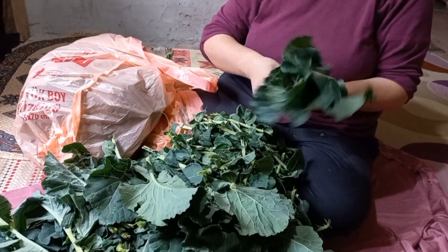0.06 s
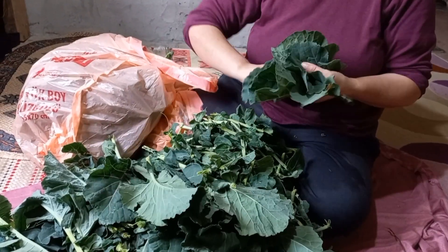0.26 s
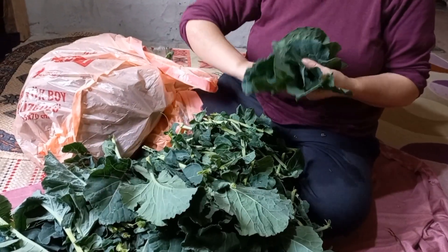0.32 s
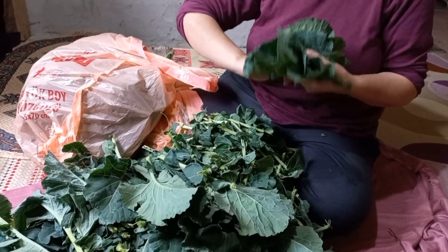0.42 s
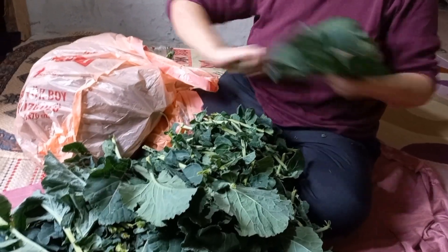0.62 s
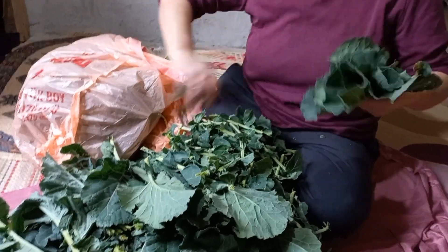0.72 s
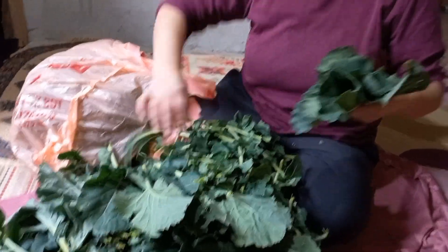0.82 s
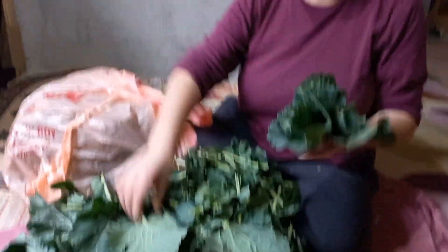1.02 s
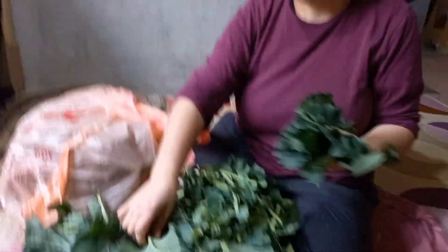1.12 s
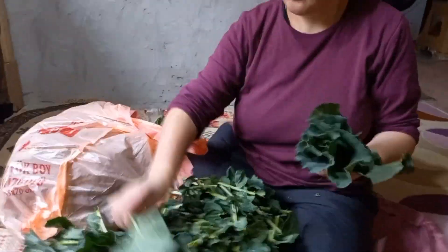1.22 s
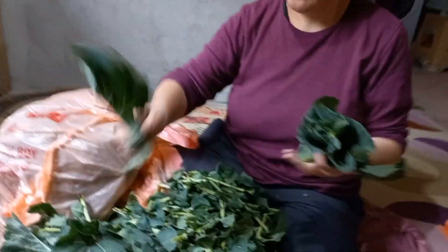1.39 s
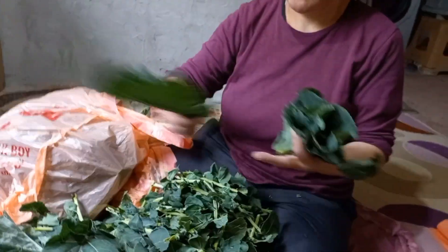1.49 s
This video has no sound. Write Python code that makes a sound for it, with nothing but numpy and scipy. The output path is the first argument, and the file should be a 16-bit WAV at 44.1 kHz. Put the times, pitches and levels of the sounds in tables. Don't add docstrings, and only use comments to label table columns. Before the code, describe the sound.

Crisp leaf rustling with duller plastic-sack rubbing, heard near the microphone indoors; one sharp loud stalk crack early, two weaker ones after, then a low fluttering leaf drag, short room echo and faint hiss.

```python
import sys
import numpy as np
from scipy import signal
from scipy.fft import rfft, irfft, next_fast_len
from scipy.io import wavfile
from scipy.ndimage import uniform_filter1d, map_coordinates

SR = 44100
rng = np.random.default_rng(int(sys.argv[2]) if len(sys.argv) > 2 else 0)


def volts(x):
    e = np.asarray(x, float) / 20
    return 10 ** e


def pcm_store(signal):
    levels = np.round(np.clip(np.atleast_2d(signal), -1, 1) * 32767)
    wavfile.write(sys.argv[1], SR, levels.astype(np.int16).T)


N = 68355

# frequency_hz, density_db (per Hz)
FRACTURE_HISS = [(300, -61), (900, 2.5), (1400, -30), (3000, 4.5), (8000, 6), (15000, 4)]
LEFT_LAG_S = 3 / 44100
FLOP_PAN_DB = -4


def unit(x):
    return x / np.sqrt(np.mean(x ** 2) + 1e-20)


def along(points, hz):
    f, v = np.transpose(points)
    return np.interp(np.log(hz + 1), np.log(f + 1), v)


def curves(rows):
    s, *columns = np.transpose(rows)
    return [np.interp(np.arange(N) / SR, s, column) for column in columns]


def wobble(rate):
    return map_coordinates(rng.standard_normal(200), [np.arange(N) * rate / SR])


def filtered(x, response):
    m = next_fast_len(x.shape[-1] + 8192)
    spectrum = rfft(x, m) * response(np.fft.rfftfreq(m, 1 / SR))
    return irfft(spectrum, m)[..., :x.shape[-1]]


def coloured(x, spectrum):
    return filtered(x, lambda hz: volts(along(spectrum, hz)))


def paired(pair, likeness=None, lag_s=LEFT_LAG_S):
    # frequency_hz, likeness (0-1)
    diffuse = [(80, 0.71), (300, 0.79), (1000, 0.19), (2500, 0.47), (6000, 0.024)]
    if likeness is None:
        likeness = diffuse

    def mid_side(hz):
        angle = np.arccos(np.clip(along(likeness, hz), 0, 1)) / 2
        return np.array([np.cos(angle), np.sin(angle)])

    def delay(hz):
        return np.exp(-2j * np.pi * hz * lag_s * np.array([[1], [0]]))

    mid, side = filtered(pair, mid_side)
    return filtered(np.array([mid + side, mid - side]), delay)


def rush(spectrum, patchy_db):
    z = signal.stft(rng.standard_normal((2, N)), nperseg=256)[2]
    field = uniform_filter1d(rng.standard_normal(z.shape[1:]), size=5, axis=0)
    field = uniform_filter1d(field, size=10, axis=1)
    pair = signal.istft(z * volts(patchy_db * unit(field)), nperseg=256)[1][:, :N]
    return unit(paired(coloured(pair, spectrum)))


def room(x):
    # frequency_hz, t60_s
    decay = [(200, 0.58), (2000, 0.28), (6000, 0.23), (14000, 0.22)]
    hz, t, z = signal.stft(rng.standard_normal((2, SR // 3)), SR, nperseg=128)
    decayed = z * volts(-60 * t / along(decay, hz)[:, None])
    tail = paired(signal.istft(decayed, SR, nperseg=128)[1])
    delayed = np.pad(x, (90, 0))
    return signal.fftconvolve(delayed[None], tail / np.linalg.norm(tail[0]), axes=1)


def add(out, s, pair, sent, pan_db=0, lag_s=LEFT_LAG_S):
    # frequency_hz, likeness (0-1)
    direct_likeness = [(300, .95), (2000, .9), (4500, .6), (9000, .3)]
    both = room(sent)
    pan = volts(np.array([[pan_db / 2], [-pan_db / 2]]))
    both[:, :pair.shape[1]] += paired(pair, direct_likeness, lag_s) * pan
    out[:, round(s * SR):][:, :both.shape[1]] += both


def burst(t, t60, spectrum):
    noise = unit(coloured(rng.standard_normal((2, len(t))), spectrum))
    return noise * volts(-60 * t / t60) * (1 - np.exp(-t / 0.000067)) / 2


def impulse(t):
    return 1. * (np.arange(len(t)) == 40)


def air():
    # frequency_hz, density_db (per Hz)
    floor = [(25, -86), (55, -20), (90, -3.5), (220, -7.5), (450, -11.5), (1000, -18), (3000, -24.5),
             (15000, -25.5)]
    level_db = -68.5 - 1.5 + 0.67 * wobble(12.1)
    return volts(level_db) * rush(floor, patchy_db=3.5)


def rubbing():
    # start_s, level_db, brightness (0-1)
    strokes = [(0, -50.5, 0.04), (.045, -58, 0.43), (.155, -49, 0.89), (.2, -50.5, 0.77),
               (.395, -57.5, 0.78), (.44, -65.5, 0.56), (.46, -51.5, 0.74), (.512, -59.5, 0.33),
               (.519, -55, 0.8), (.558, -52, 1), (.598, -65.5, 0.88), (.7, -58.5, 0.24), (.76, -54.5, 0.32),
               (.87, -55, 0.3), (.92, -51.5, 0.2), (1.09, -63.5, 0.56), (1.16, -53, 0.82), (1.23, -59, 0.6),
               (1.33, -57.5, 0.56), (1.38, -69.5, 0.53), (1.55, -70, 0.65)]
    # frequency_hz, density_db (per Hz)
    dull = [(300, -13), (600, -12.5), (950, -12.5), (1400, -2), (2600, -5), (4500, -8), (9000, -18.5),
            (15000, -14.5)]
    # frequency_hz, density_db (per Hz)
    crisp = [(300, -22), (900, -19), (1400, -27.5), (2500, -1), (4500, -3.5), (7500, -2), (11000, -4.5),
             (15000, -8)]
    grains_per_s, grain_spread_db, grain_db, wet_db = 1400, 10.5, 2, -3.5
    level_db, bright = curves(strokes)
    bright, out = np.clip(bright, 0, 1), 0
    for spectrum, share in ((dull, 1 - bright), (crisp, bright)):
        draw = rng.random((2, N))
        slips = (draw[0] < grains_per_s / SR) * volts(-grain_spread_db * draw[1])
        grain_noise = uniform_filter1d(slips, size=24) * rng.standard_normal((2, N))
        cracks = unit(coloured(grain_noise, spectrum))
        grains = unit(paired(cracks) + volts(wet_db) * room(cracks[0])[:, :N])
        gain = volts(level_db + .8 * wobble(25) + wobble(90)) * np.sqrt(share)
        out = out + gain * unit(rush(spectrum, patchy_db=2.2) + volts(grain_db) * grains)
    return out


def drag():
    # time_s, level_db
    rumble = [(.985, -68), (.997, -57.5), (1.068, -58), (1.078, -61), (1.11, -59), (1.145, -60),
              (1.175, -63), (1.195, -72), (1.31, -72), (1.36, -81)]
    # frequency_hz, density_db (per Hz)
    rumble_colour = [(40, -30), (85, -3), (150, -5), (350, -1), (540, 0), (700, -16), (1000, -30),
                     (2000, -60)]
    # time_s, level_db
    swish = [(.97, -67), (.99, -54), (1.03, -59.5), (1.08, -62), (1.115, -60), (1.17, -53.5), (1.195, -62),
             (1.32, -77)]
    # frequency_hz, density_db (per Hz)
    swish_colour = [(300, -16), (600, -3), (850, -3), (1100, 0), (1700, -3), (2800, -6), (8000, -12),
                    (15000, -20)]
    rumble_db, = curves([(rumble[0][0] - .1, -99)] + list(rumble) + [(rumble[-1][0] + .05, -99)])
    swish_db, = curves([(swish[0][0] - .05, -99)] + list(swish) + [(swish[-1][0] + .05, -99)])
    brushing = volts(swish_db + 2.3 * wobble(80.06)) * rush(swish_colour, patchy_db=2.0)
    sliding = volts(rumble_db + 2.8 * wobble(59.7)) * rush(rumble_colour, patchy_db=-1.0)
    return brushing + sliding * volts([[FLOP_PAN_DB / 2], [-FLOP_PAN_DB / 2]])


def flops():
    # start_s, level_db (peak), pitch_hz
    pushes = [(.004, -54.5, 467), (0.238, -56.5, 248), (0.381, -53, 370), (.392, -60, 300),
              (0.618, -57, 357), (.998, -50, 470), (1.002, -48, 400), (1.013, -52, 280), (1.0315, -43, 360),
              (1.041, -52, 330), (1.055, -49, 430), (1.061, -43.5, 380), (1.067, -49, 330),
              (1.093, -52, 400), (1.105, -52, 200), (1.12, -46, 380), (1.1245, -44, 330),
              (1.1325, -41.5, 330), (1.14, -48, 330), (1.165, -56, 139), (1.262, -62, 92),
              (1.309, -58.5, 119), (1.484, -61.5, 95)]
    cycles, wet_db = 2.6, -9
    out, t = np.zeros((2, N + SR)), np.arange(SR // 8) / SR
    for s, db, hz in pushes:
        u = t * hz / cycles * 6
        glide = 1 - 0.026 * np.tanh(u / 4)
        push = volts(db) * np.sin(2 * np.pi * hz * t * glide) * u * np.exp(1 - u)
        add(out, s, np.array([push, 0 * push]), volts(wet_db) * push, FLOP_PAN_DB)
    return out[:, :N]


def creases():
    # start_s, level_db (peak), pitch_hz
    buckles = [(.006, -56, 2060), (0.0513, -58, 3120), (0.074, -52.5, 3400), (0.138, -43.5, 6060),
               (0.407, -49.5, 7200), (0.455, -56, 3500), (0.479, -59.5, 3970), (0.5594, -62, 4300),
               (0.707, -52, 2600), (0.73, -43, 10800), (0.804, -57, 3030), (0.825, -63, 2940),
               (0.908, -53, 2890), (0.978, -60, 1667), (1.016, -52, 12100), (1.2477, -53.5, 7230),
               (1.301, -57, 2850), (1.324, -76, 7150), (1.533, -56, 4900)]
    cycles, hiss_db, wet_db = 14.6, 10, 6.5
    out, t = np.zeros((2, N + SR)), np.arange(SR // 40) / SR
    for s, db, hz in buckles:
        ring = np.sin(2 * np.pi * (hz * t + rng.random((2, 1)))) * np.exp(-t * hz / cycles)
        lean = [(hz / 4, -18), (hz, 0), (hz * 4, -10)]  # Hz, dB
        puff = coloured(burst(t, 0.0069, FRACTURE_HISS), lean)
        tick = volts(db) * (ring + volts(hiss_db) * puff)
        crack = coloured(coloured(impulse(t), FRACTURE_HISS), lean)
        crack = crack * np.linalg.norm(tick[0]) / np.linalg.norm(crack)
        add(out, s, tick, volts(wet_db) * crack)
    return out[:, :N]


def fibres():
    # start_s, level_db (peak), pitch_hz
    clicks = [(.2297, -22, 10200), (.2303, -24, 9900), (.2308, -28, 3200), (.235, -30, 3100),
              (.2312, -25, 11800), (.2322, -29, 4300), (.2375, -29, 4600), (.2337, -25, 13500),
              (.2403, -32, 1900), (.2405, -31, 7500), (.2522, -27, 2000), (.2524, -28, 3300),
              (.3722, -54, 1100), (.408, -50, 7000), (.5172, -44, 8000), (.5178, -46, 12500),
              (.5215, -41, 4400), (.5235, -43, 3900), (.5312, -41, 7800), (.5442, -45, 8200),
              (.5578, -42, 4500), (.6108, -35, 12200), (.6153, -33, 3200), (.6163, -38, 7300),
              (.6173, -36, 4300), (.6265, -40, 2700), (.728, -45, 11000), (.911, -47, 2900),
              (1.017, -42, 12500), (1.2495, -45, 7000), (1.312, -53, 9000), (1.322, -53, 7000)]
    out, t = np.zeros((2, N + SR)), np.arange(SR // 20) / SR
    for s, db, hz in clicks:
        u = t * hz / .9
        pulse = np.sin(2 * np.pi * hz * t) * u * np.exp(1 - u) * [[1], [.3]]
        tick = volts(db + 1) * (pulse + .7 * burst(t, .005, FRACTURE_HISS))
        add(out, s, tick, volts(-3) * tick[0], lag_s=0)
    return out[:, :N]


def snaps():
    # start_s, level_db (peak), stalk (index), ring_db
    events = [
        (.2282, -15.5, 0, 2.5),
        (.5167, -37, 1, 3),
        (.6055, -27, 2, 5),
    ]
    # frequency_hz, width_hz, level_db
    modes = [
        [(1650, 330, -2), (2250, 420, 0), (3100, 450, -3), (4500, 400, -8), (6300, 400, -10), (8200, 400, -8),
         (10200, 350, -4), (12300, 350, -8), (14500, 350, -8)],
        [(1500, 250, -15), (4100, 300, 0), (7800, 350, -3), (12400, 350, -8)],
        [(1300, 110, -13), (3050, 260, -1), (4770, 290, 1), (7000, 300, -2), (12100, 300, -8), (14300, 300, -7)],
    ]
    # frequency_hz, density_db (per Hz)
    tears = [
        [(200, -29.5), (900, -15.5), (1250, -6.5), (2400, -9), (4500, -4), (6000, -6.5), (11000, -5),
         (15000, -4)],
        [(200, -43), (1000, -19), (1400, 6), (2500, 7), (4200, 9), (7800, 9.5), (15000, -2)],
        [(200, -25.5), (950, -20.5), (1300, -7), (2200, -12.5), (3000, -10), (5500, -13), (15000, -17)],
    ]
    rise_s, hiss_db, wet_db, ring_wet_db = .0009, -5, 8, -19
    out, t = np.zeros((2, N + SR)), np.arange(SR // 20) / SR
    for s, db, which, ring_db in events:
        ring = 0
        for hz, width, mode_db in modes[int(which)]:
            tone = np.sin(2 * np.pi * (hz * t + rng.random((2, 1))))
            ring = ring + volts(mode_db) * tone * np.exp(-np.pi * width * t)
        ring = ring * np.tanh(t / rise_s) ** 2 * [[1], [.5]]
        ring = volts(db + ring_db) * ring / np.abs(ring[0]).max()
        tear = tears[int(which)]
        hiss = volts(db) * burst(t, .012, tear)
        crack = coloured(impulse(t), tear)
        crack = crack * np.linalg.norm(hiss[0]) / np.linalg.norm(crack)
        sent = volts(wet_db) * (crack + volts(ring_wet_db) * ring[0])
        add(out, s, ring + volts(hiss_db) * hiss, sent)
    return out[:, :N]


def scene():
    return air() + rubbing() + drag() + flops() + creases() + fibres() + snaps()


def band_limit(x):
    return signal.sosfilt(signal.butter(12, 16450, fs=SR, output="sos"), x)


def record(dry):
    # frequency_hz, response_db
    response = [(30, -18), (70, 0), (14900, 0), (15450, -4), (15750, -20), (16350, -32), (16550, -55)]
    return band_limit(coloured(dry, response))


dry = scene()
out = record(dry)
pcm_store(out)
```